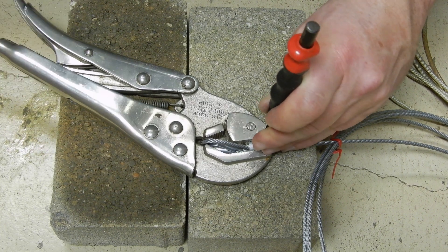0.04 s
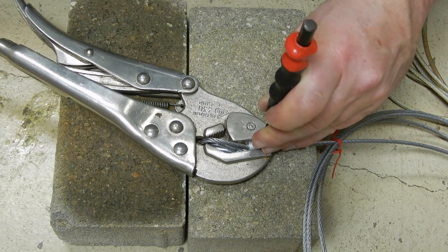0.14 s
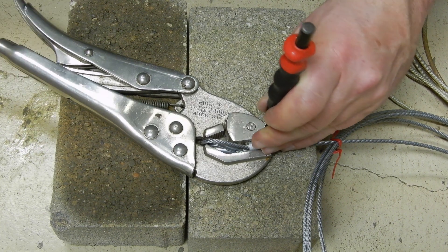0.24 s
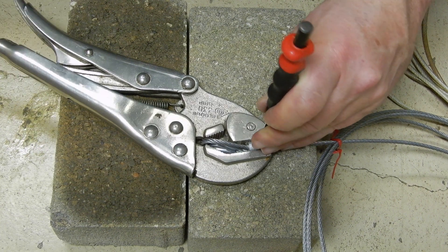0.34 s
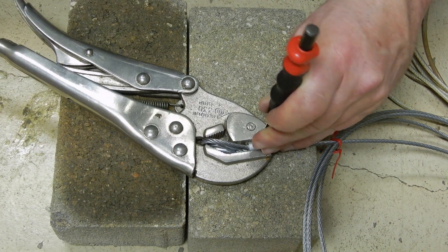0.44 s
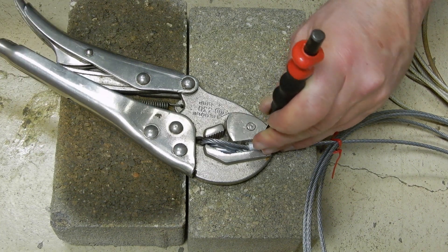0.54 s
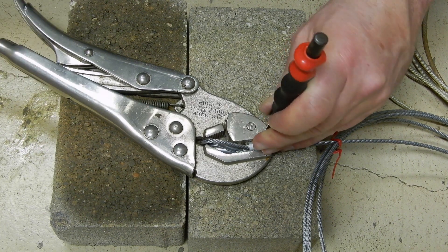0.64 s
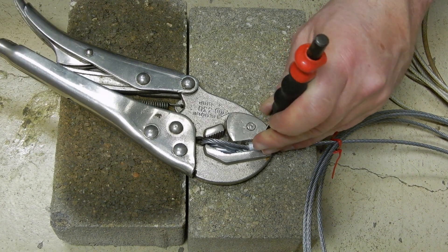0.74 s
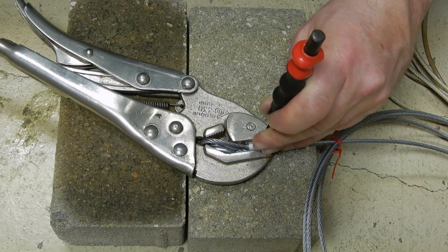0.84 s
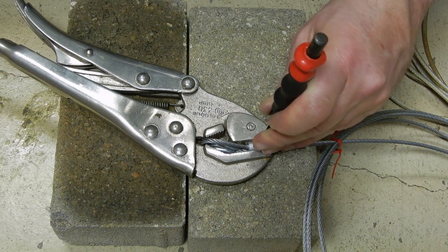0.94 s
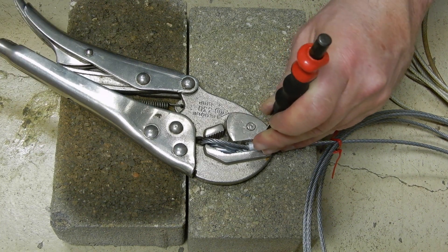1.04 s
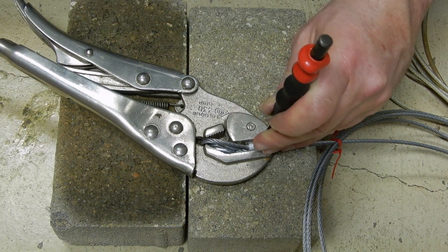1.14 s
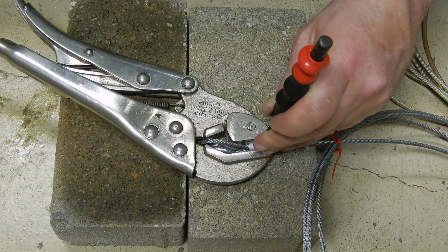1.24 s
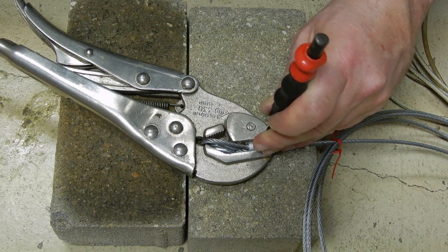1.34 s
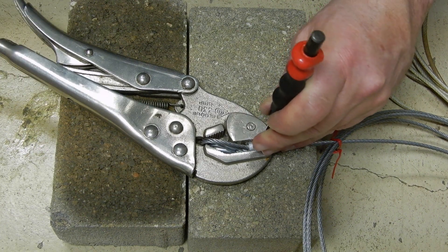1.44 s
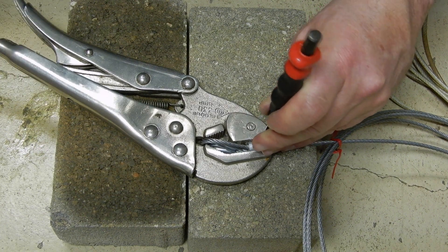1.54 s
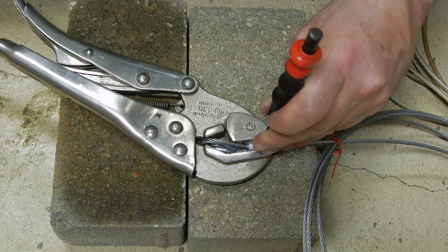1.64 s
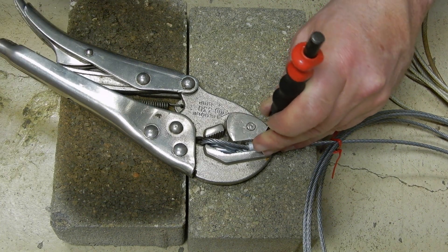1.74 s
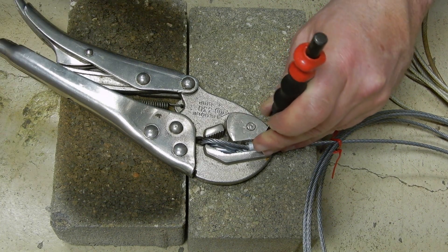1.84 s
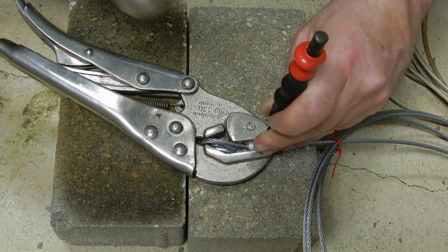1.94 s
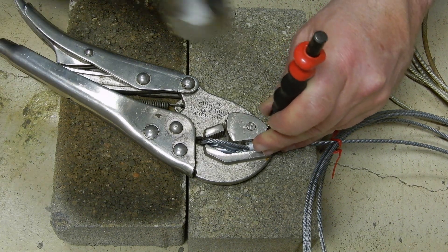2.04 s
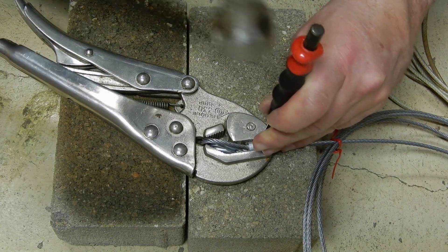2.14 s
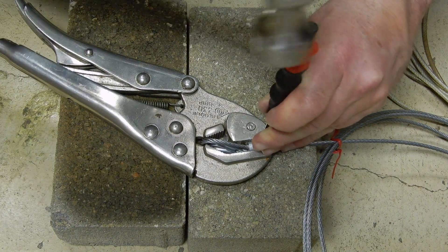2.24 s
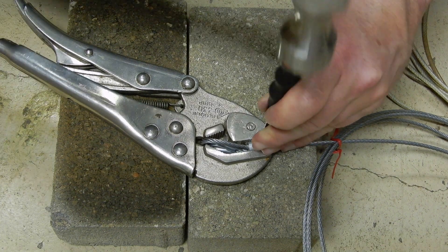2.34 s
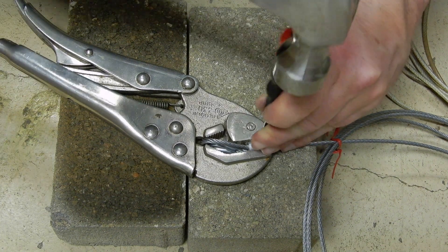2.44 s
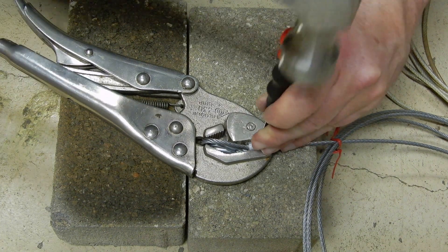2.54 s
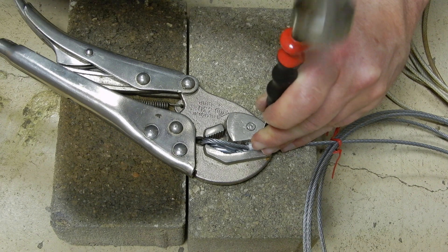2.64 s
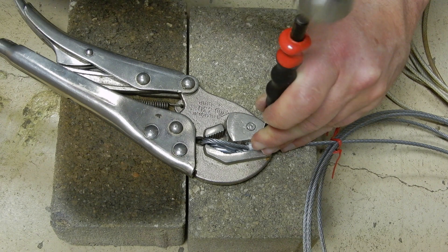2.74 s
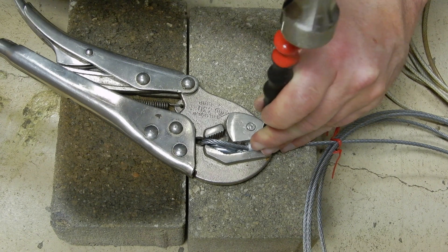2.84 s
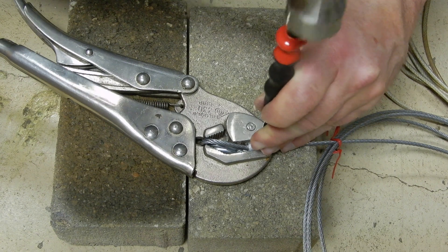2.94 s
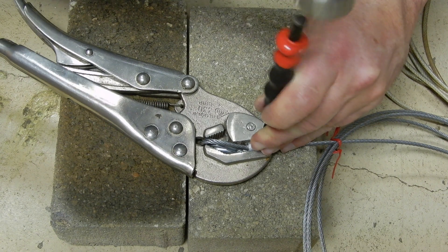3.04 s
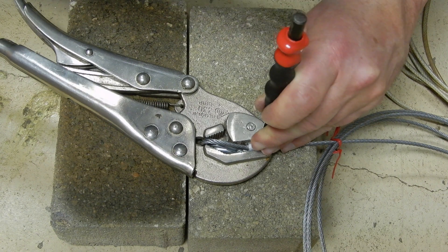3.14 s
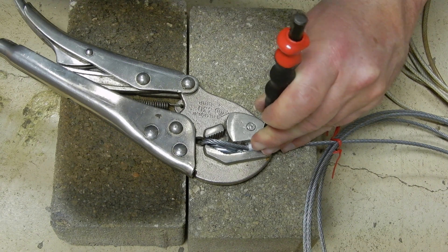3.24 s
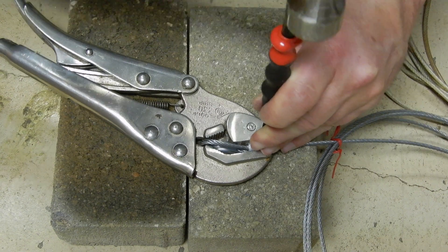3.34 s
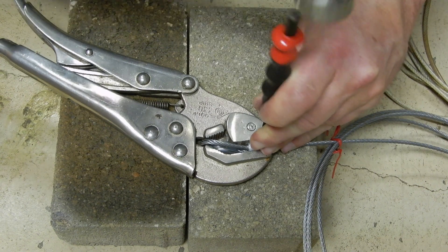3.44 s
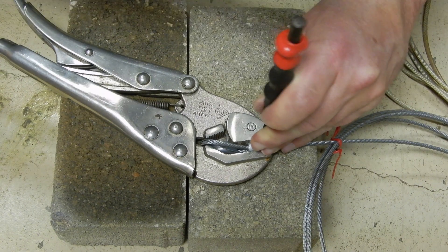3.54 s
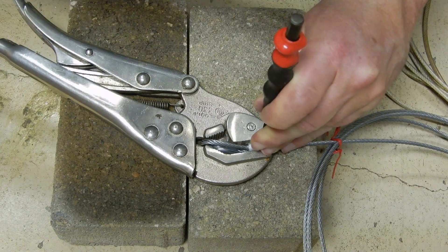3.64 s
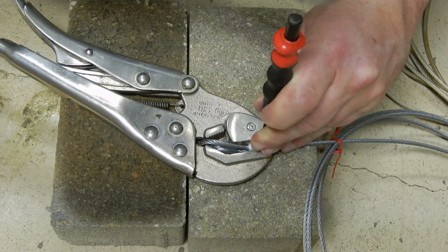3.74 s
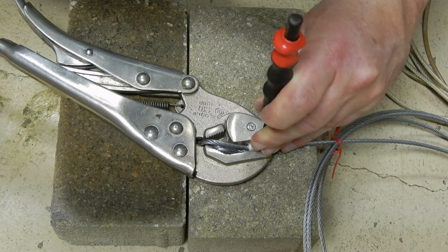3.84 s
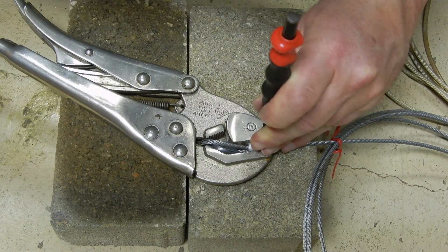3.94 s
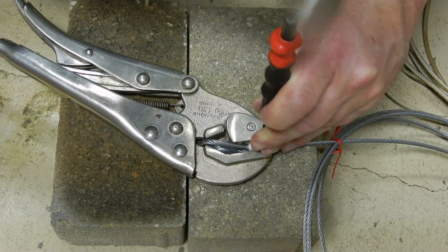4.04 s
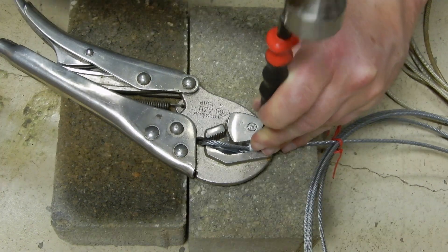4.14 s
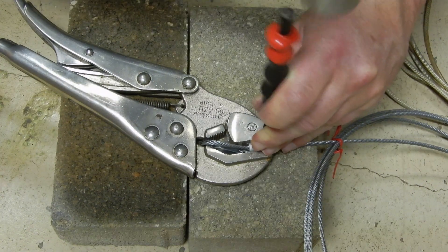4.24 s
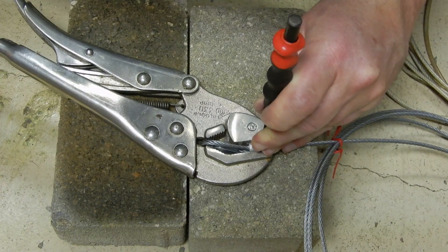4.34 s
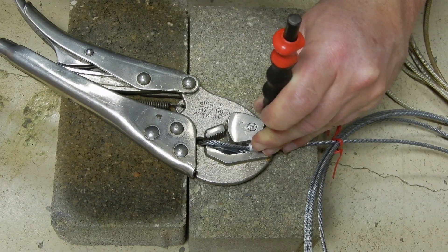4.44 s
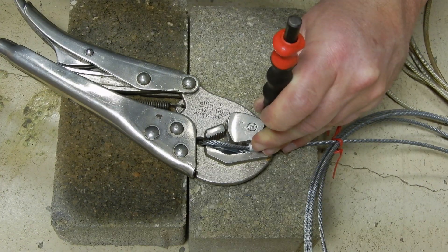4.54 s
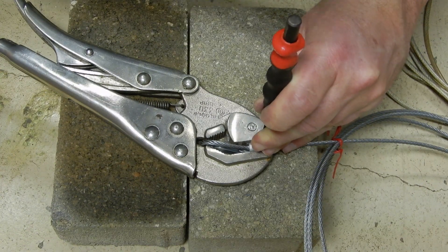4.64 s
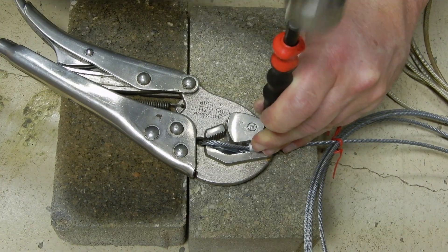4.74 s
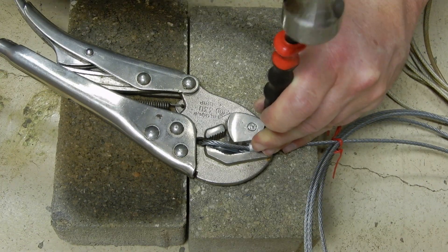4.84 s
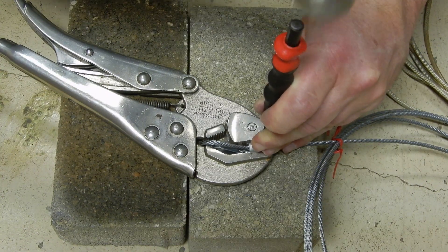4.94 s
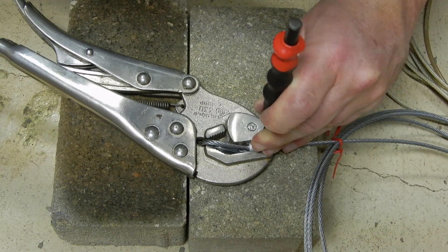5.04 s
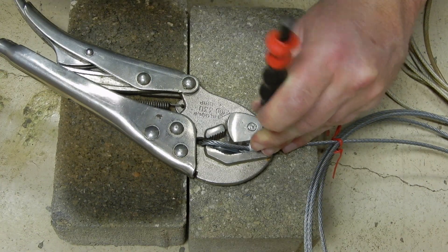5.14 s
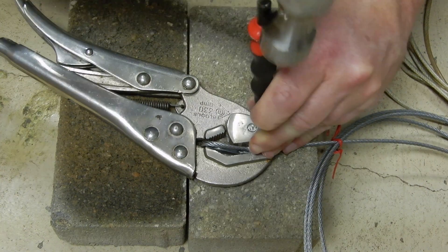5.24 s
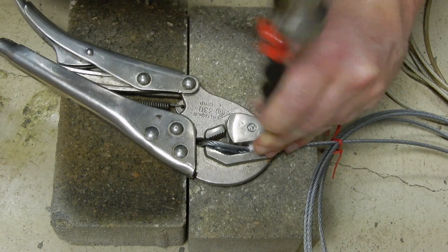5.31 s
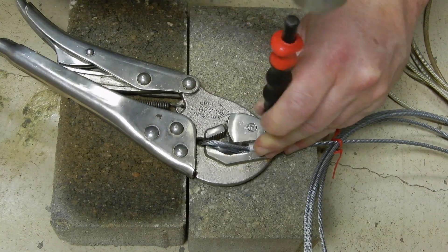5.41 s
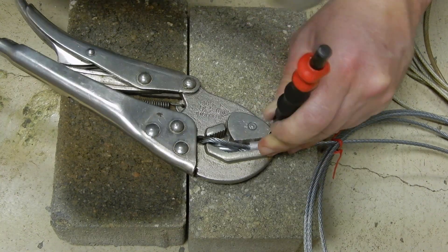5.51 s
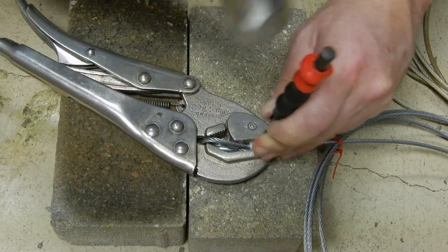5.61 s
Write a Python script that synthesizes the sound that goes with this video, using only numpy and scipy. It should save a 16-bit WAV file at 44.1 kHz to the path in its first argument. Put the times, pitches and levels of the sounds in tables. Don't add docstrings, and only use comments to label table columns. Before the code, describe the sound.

Close view of a workshop bench with low ventilation and mains hum. Faint hand and cable scuffs and a soft set-down come first, then a light clink and tap, followed by four hard, spaced steel-on-steel blows. Each cracks brightly, rings briefly and thumps through pliers and concrete blocks. The automatic gain dips the background after hard hits; the last blow bounces.

```python
import sys
import numpy as np
from scipy import signal
from scipy.io import wavfile
from scipy.ndimage import uniform_filter1d

SR = 44100
rng = np.random.default_rng(int(sys.argv[2]) if len(sys.argv) > 2 else 0)


def generate_wav(sig):
    pcm = np.round(np.clip(np.atleast_2d(sig).T, -1, 1) * 32767).astype(np.int16)
    wavfile.write(sys.argv[1], SR, pcm)


def nominal_scale(level):
    x = np.asarray(level, float) / 20
    return 10 ** x


N = 250204

# frequency in Hz, level in dB per Hz.
AIR_COLOUR = [(35, -73), (60, -38), (113, -13), (200, -7), (300, -5), (530, -10), (700, -13), (1470, -21),
              (2200, -29), (3500, -31), (4700, -36), (5500, -43), (11500, -46), (16000, -51)]
# frequency in Hz, width in Hz, level in dB.
DUCT_MODES = [(240, 20, -16), (520, 50, -13), (980, 70, -14), (1430, 90, -14), (1750, 80, -18),
              (2050, 110, -19), (2350, 100, -23), (3500, 150, -26)]
# time in seconds, level in dB.
DRAUGHT_LEVEL = [(0, 1), (.3, 0.65), (.65, -3.5), (1.001, 0.45), (4.752, -2.38), (5.081, 2.5), (5.33, -3.3)]
# frequency in Hz, level in dB against the air.
HUM_LINES = [(120, -14), (239.5, -5.5)]
# frequency in Hz, left-right likeness from 0 to 1.
STEREO_LIKENESS = [(60, 0.29), (180, 0.21), (550, 0.06), (1650, 0.087), (4970, 1), (15000, 1)]
# frequency in Hz, left minus right in dB.
STEREO_LEAN = [(60, -0.5), (240, 2), (950, 2), (3770, 4), (15000, 9.5)]
# start in seconds, length in seconds, level in dB, centre in Hz.
SHUFFLE_EVENTS = [
    (0, 0.079, -49, 4850),
    (0.364, 0.062, -46.5, 400),
    (0.66, .02, -37.5, 230),
    (1.138, 0.045, -50, 200),
    (1.563, 0.18, -50, 930),
    (1.909, 0.092, -41, 614),
    (2.176, .05, -44, 484),
]
# frequency in Hz, level in dB, decay t60 in seconds.
ROOM_TAIL = [(151, -11.5, 0.34), (400, -11.5, 0.41), (1040, -14, 0.35), (2010, -17.5, 0.23),
             (4243, -23, 0.42), (6040, -22.5, 0.24), (7240, -21.5, 0.15), (11000, -19.5, 0.18),
             (13500, -21.5, .11), (14800, -9.5, .17)]
# time in seconds, level in dB, centre in Hz.
TICKS = [(.255, -47.5, 7900), (0.311, -48.5, 6000), (.7553, -64, 2500), (2.4245, -65, 3000),
         (2.491, -23, 2960), (2.496, -17, 1650), (2.5025, -20.5, 1300), (2.5467, -34.5, 2190),
         (2.559, -47.5, 5000), (2.646, -46, 3430), (2.7153, -72, 4000), (2.9104, -32.5, 1700),
         (5.599, -67, 5100), (5.6712, -54, 3000)]
# time in seconds, lower block in dB, upper block in dB, pliers in dB,
# hardness in dB per octave over the plier modes.
THUMP_EVENTS = [
    (0.7017, -22, -28.5, -27.5, -18),
    (0.7071, -22.5, -40.5, -34, -22),
    (2.493, -23.5, -29.5, -18.5, -9.5),
    (2.9619, -23, -31, -41.5, 3.5),
    (3.4569, -17, -17.5, -17.5, -13),
    (4.2269, -20, -19.5, -19.5, 4),
    (5.35, -26.5, -24.5, -20.5, 5),
    (5.598, -51.5, -57, -74, 7.5),
    (5.6715, -40, -49.5, -50, -12.5),
]
# frequency in Hz, level in dB, decay t60 in seconds.
BLOCK_MODES = [(209, -3.5, 0.064), (261, 0, 0.039), (425, 2, 0.026), (460, -6.5, 0.11), (628, 4.5, 0.0099),
               (885, 1, 0.021), (1116, 0.5, 0.022), (1378, 1.5, 0.016), (1800, -2, 0.011),
               (2295, -2.5, 0.014)]
BODY_OF_EACH_MODE = [0, 0, 1, 1, 1, 1, 2, 2, 2, 2]
# time in seconds, crack in dB, middle ring in dB, high ring in dB,
# side ring in dB.
HAMMER_BLOWS = [
    (2.4923, -29.5, -27, -37, -36),
    (2.9601, -16, -29, -20.5, -34.5),
    (3.4563, -17, -41, -16.5, -33),
    (4.226, -17.5, -17, -19, -37.5),
    (5.349, -17, -16.5, -26, -21),
    (5.3804, -32, -39, -37, -50.5),
    (5.414, -51, -52, -49, -53),
]
# frequency in Hz, level in dB per Hz.
CRACK_COLOUR = [(500, -26), (1500, -4), (3500, -2), (6000, 1), (8300, -8.5), (9500, -8.5), (12000, -15.5),
                (16000, -22.5)]
# frequency in Hz, level in dB, decay t60 in seconds.
PUNCH_MODES = [(4228, 0, .03), (5716, 0, .022), (7690, 0, .022), (6740, 0, .028)]
# frequency in Hz, level in dB, decay t60 in seconds.
HEAD_MODES = [(4232, -36.5, 0.36), (5722, -38.5, 0.29), (7300, -41, 0.21), (6750, -33, .16)]
# start in seconds, depth in dB, fall in seconds, hold in seconds.
GAIN_DUCKS = [
    (2.996, 16, 0.1, 0.066),
    (3.458, 9.5, .18, 0.18),
    (4.226, 12, 0.2, .14),
    (5.351, 11, 0.24, 0.26),
]
# frequency in Hz, noise against the signal in dB, level in dB below which a line drops out.
CAMERA_GRAIN = [(200, -20, -125), (999, -14.5, -106), (1700, -12, -99), (2500, -9.5, -98),
                (6000, -11, -100), (9550, -4.5, -101), (16000, -6, -100)]

EDGES_HZ = 25 * 2 ** np.arange(0, 9.5, 1 / 3)
BANK = [signal.butter(2, pair, "band", fs=SR, output="sos") for pair in zip(EDGES_HZ, EDGES_HZ[1:])]
WHINE_HZ, WHINE_DB, WHINE_PER_S = 11350, -29, 30
PLIERS_HZ = 1250
LOW_RING_DB = -4
CRACK_T60_S = 0.019
REST_DB, RECOVER_DB_PER_S = -47.5, 17.5
MIC_CUT_HZ, HISS_CUT_HZ = 110, 15900
HOP, FIRST_FRAME = 941, 345


def rms_one(x):
    return x / np.sqrt(np.mean(x ** 2) + 1e-20)


def at_hz(points, hz, axis=1):
    points = np.array(points)
    return np.interp(np.log(hz), np.log(points[:, 0]), points[:, axis])


def drift(rate):
    r = np.exp(-80 * np.pi * rate / SR)
    slow = signal.lfilter([1], [1, -2 * r, r * r], rng.standard_normal(N // 40 + 2002))[2000:]
    return np.interp(np.arange(N) / 40, np.arange(len(slow)), rms_one(slow))


def ring(clicks, hz, t60):
    r, w = nominal_scale(-60 / (t60 * SR)), 2 * np.pi * hz / SR
    return signal.lfilter([0, np.sin(w)], [1, -2 * r * np.cos(w), r * r], clicks + 1e-18)


def bands(length):
    white = rng.standard_normal((2, 2, length))
    for k, sos in enumerate(BANK):
        yield np.sqrt(EDGES_HZ[k] * EDGES_HZ[k + 1]), signal.sosfilt(sos, white[k % 2])


def hump(hz, slope_db):
    return [(hz / 16, -3.5 * slope_db), (hz / 1.4, 0), (hz * 1.4, 0),
            (hz * 16, -3.5 * slope_db), (hz * 64, -6 * slope_db)]


def gain_db(s):
    points = [(0, REST_DB), (GAIN_DUCKS[0][0], REST_DB)]
    ends = [row[0] for row in GAIN_DUCKS[1:]] + [N / SR + 1]
    for (start, depth_db, fall, hold), end in zip(GAIN_DUCKS, ends):
        low_db = points[-1][1] - depth_db
        free = start + fall + max(hold, .001)
        back_db = min(low_db + RECOVER_DB_PER_S * (end - free), REST_DB)
        points += [(start + fall, low_db), (free, low_db), (end, back_db)]
    return np.interp(s, *np.transpose(points))


def burst(times, levels_db, spectrum, envelope):
    out = np.zeros(N + len(envelope))
    for s, level_db in zip(times, levels_db):
        noise = sum(nominal_scale(at_hz(spectrum, hz)) * mid for hz, (mid, side) in bands(len(envelope)))
        i = int(s * SR)
        out[i:i + len(envelope)] += nominal_scale(level_db - gain_db(s)) * rms_one(noise) * envelope
    return out[:N]


def strike(times, levels_db, modes, spread_db):
    at = np.minimum((np.asarray(times) * SR).astype(int), N - 1)
    chance = rng.standard_normal((len(at), len(modes)))
    levels_db = np.transpose(levels_db - gain_db(times)).reshape(len(at), -1)
    levels_db = np.broadcast_to(levels_db, chance.shape)
    out = np.zeros(N)
    for k, (hz, mode_db, t60) in enumerate(modes):
        clicks = np.zeros(N)
        clicks[at] = nominal_scale(levels_db[:, k] + mode_db + spread_db * chance[:, k]) * (-1) ** k
        out += ring(clicks, hz, t60)
    return out


def air(draught_db, patchy_db):
    out, together = 0, drift(10.0)
    for hz, (mid, side) in bands(N):
        alike = np.clip(at_hz(STEREO_LIKENESS, hz), 0, 1)
        lean_db = at_hz(STEREO_LEAN, hz) / 2
        gain = nominal_scale(at_hz(AIR_COLOUR, hz) + patchy_db * (.5 * together + drift(41.0)))
        stereo = np.sqrt(1 + alike) * mid + np.sqrt(1 - alike) * side * [[1], [-1]]
        out = out + gain * stereo * nominal_scale([[lean_db], [-lean_db]])
    out = rms_one(out)
    white = rng.standard_normal(N)
    for hz, width, level_db in DUCT_MODES:
        out += nominal_scale(level_db) * rms_one(ring(white, hz, np.log(1000) / np.pi / width))
    out = out * nominal_scale(draught_db)
    t = np.arange(N) / SR
    for hz, level_db in HUM_LINES:
        out += nominal_scale(level_db + 0.5 * drift(9.0)) * np.sin(2 * np.pi * hz * t + hz)
    throb = np.clip(np.sin(2 * np.pi * WHINE_PER_S * t) + 0.91, 0, 1)
    return out + nominal_scale(WHINE_DB) * throb * np.sin(2 * np.pi * WHINE_HZ * t)


def shuffles():
    out = 0
    for s, length, level_db, hz in SHUFFLE_EVENTS:
        t = np.arange(int(3 * length * SR)) / SR / length
        envelope = np.minimum(4 * t, 1) * np.exp(-1.5 * t)
        out = out + burst([s], [level_db], hump(hz, slope_db=13), envelope)
    return out


def room(x):
    t, tail = np.arange(SR // 2) / SR, 0
    for hz, (mid, side) in bands(len(t)):
        decay = nominal_scale(at_hz(ROOM_TAIL, hz) - 60 * t / at_hz(ROOM_TAIL, hz, axis=2))
        tail = tail + decay * (mid + 0.23 * side * [[1], [-1]])
    onset = np.clip((t - .004) / 0.0015, 0, 1)
    return signal.fftconvolve(x[None], tail * onset / np.sqrt(SR * 0.004), axes=1)[:, :N]


def touches():
    t = np.arange(600) / SR
    envelope = nominal_scale(-60 * t / .014) * np.sin(np.pi / 2 * np.minimum(t / .0008, 1)) ** 2
    return sum(burst([s], [level_db], hump(hz, slope_db=21), envelope) for s, level_db, hz in TICKS)


def thumps():
    s, *bodies_db, hardness = np.transpose(THUMP_EVENTS)
    octaves = np.maximum(np.log2(np.array(BLOCK_MODES)[:, :1] / PLIERS_HZ), 0)
    levels_db = np.array(bodies_db)[BODY_OF_EACH_MODE] + octaves * hardness
    thump = strike(s, levels_db, BLOCK_MODES, spread_db=1)
    return signal.lfilter([.45], [1, -.55], thump)


def hammer_on_punch():
    s, crack_db, *rings_db = np.transpose(HAMMER_BLOWS)
    low_db = np.maximum(*rings_db[:2]) + LOW_RING_DB
    rings_db = np.array([low_db] + rings_db)
    crack = burst(s, crack_db, CRACK_COLOUR, nominal_scale(-60 * np.arange(1000) / SR / CRACK_T60_S))
    punch = strike(s, rings_db, PUNCH_MODES, spread_db=0)
    head = strike(s, rings_db, HEAD_MODES, spread_db=2)
    return crack + punch + head


def scene():
    draught_db = np.interp(np.arange(N) / SR, *np.transpose(DRAUGHT_LEVEL))
    background = air(draught_db, patchy_db=.7)
    hits = shuffles() + touches() + thumps() + hammer_on_punch()
    return hits * nominal_scale([[.2], [-.2]]) + room(hits) + background


def camera_grain(x):
    window = np.sin(np.pi * (np.arange(2 * HOP) + .5) / (2 * HOP))
    padded = np.pad(x, [(0, 0), (HOP - FIRST_FRAME, 0)])
    hz, _, lines = signal.stft(padded, SR, window, 2 * HOP, HOP)
    hz, power = np.maximum(hz, 20)[:, None], np.abs(lines) ** 2
    step = nominal_scale(at_hz(CAMERA_GRAIN, hz)) * np.sqrt(uniform_filter1d(power, size=41, axis=1))
    floor = nominal_scale(at_hz(CAMERA_GRAIN, hz, axis=2))
    kept = np.sqrt(uniform_filter1d(power, size=3, axis=1)) > floor
    noise = rng.standard_normal(lines.shape) + 1j * rng.standard_normal(lines.shape)
    lines = (lines + step * noise) * kept * (hz < HISS_CUT_HZ)
    return signal.istft(lines, SR, window, 2 * HOP, HOP)[1][:, HOP - FIRST_FRAME:][:, :N]


def band_limit(x):
    return signal.sosfilt(signal.butter(12, 16640, fs=SR, output="sos"), x)


def record(dry):
    low_cut = signal.butter(4, MIC_CUT_HZ, "high", fs=SR, output="sos")
    levelled = signal.sosfilt(low_cut, dry) * nominal_scale(gain_db(np.arange(N) / SR))
    mix = camera_grain(levelled)
    return band_limit(mix)


dry = scene()
out = record(dry)
generate_wav(out)
```